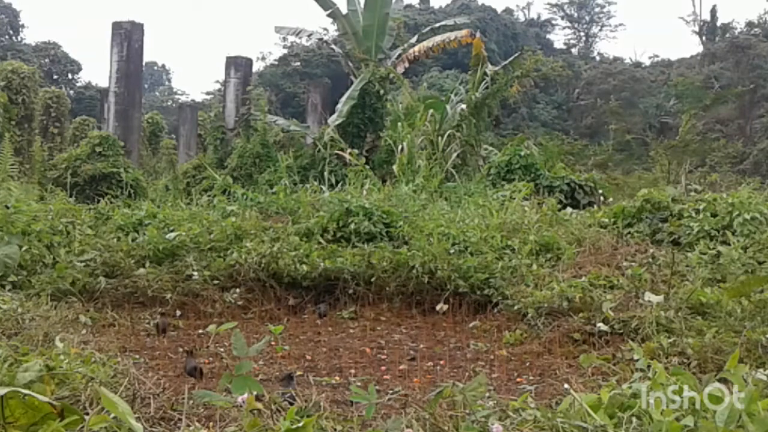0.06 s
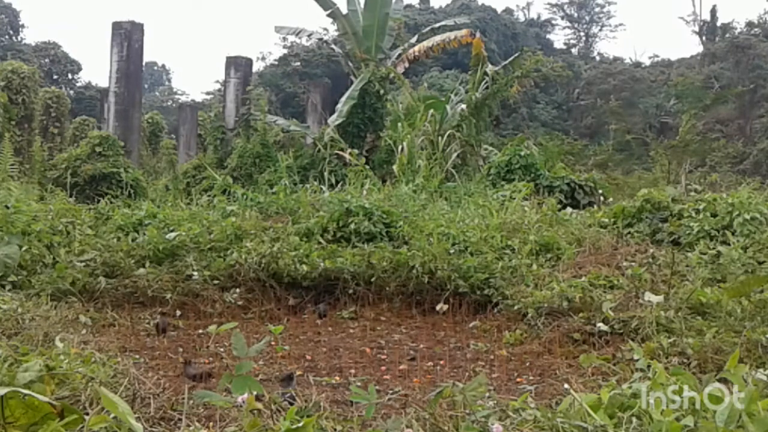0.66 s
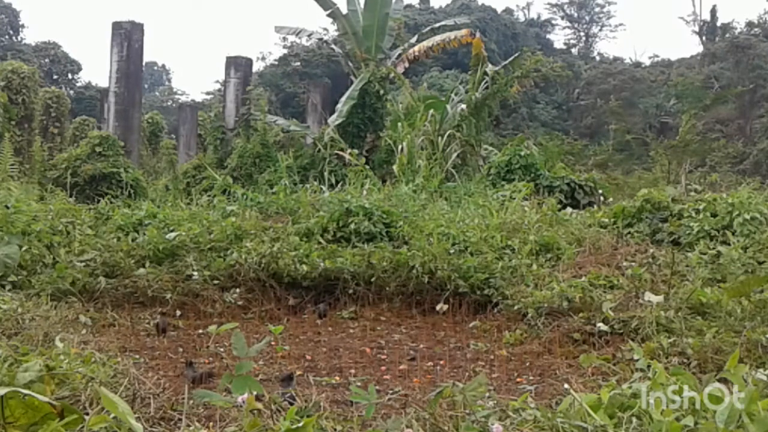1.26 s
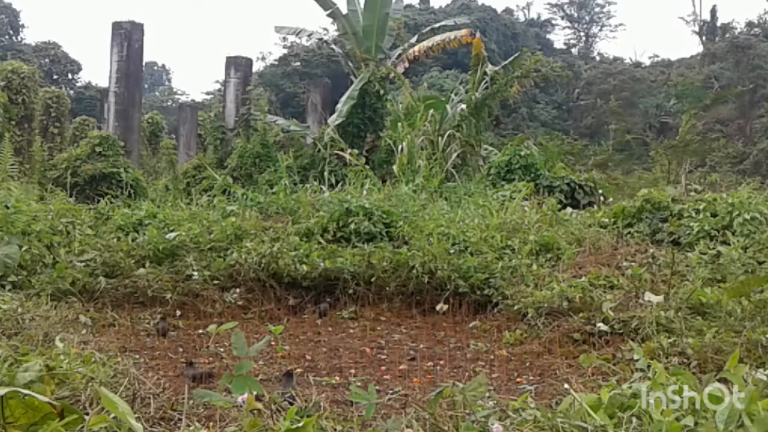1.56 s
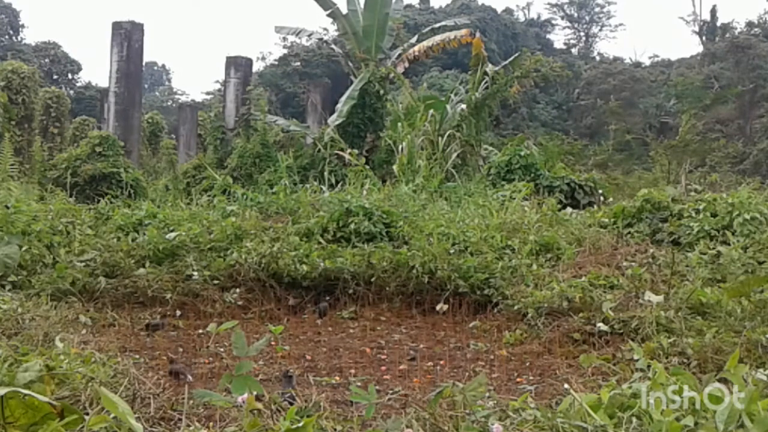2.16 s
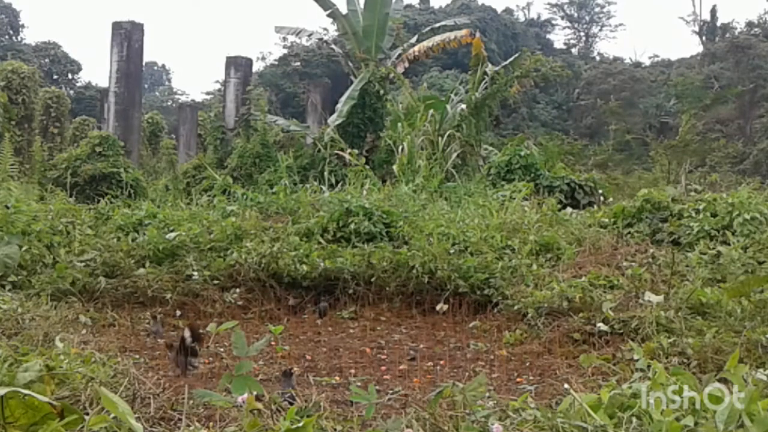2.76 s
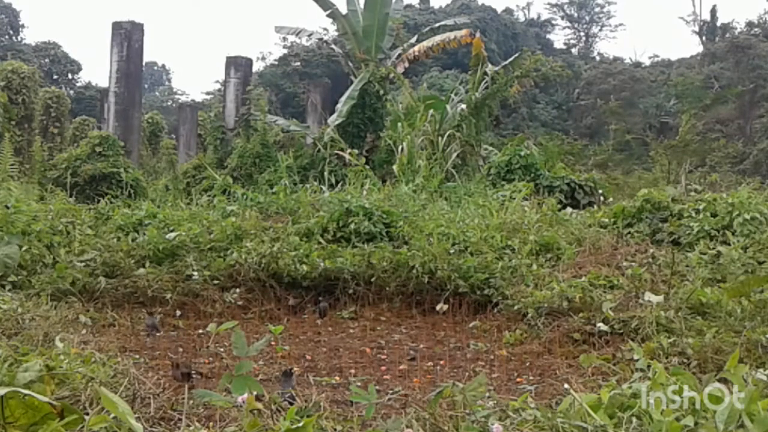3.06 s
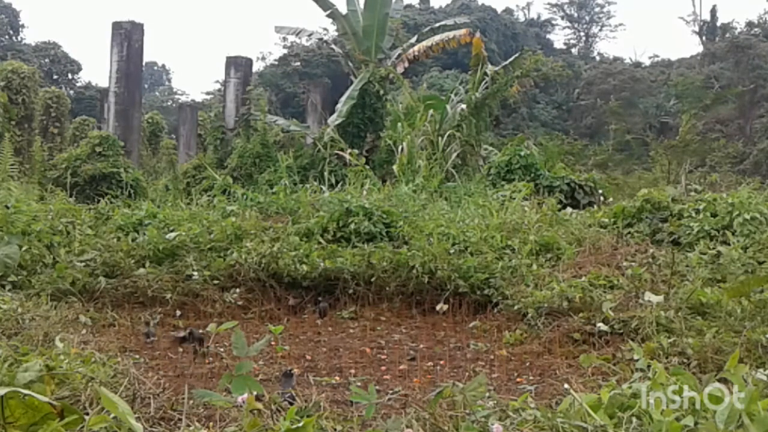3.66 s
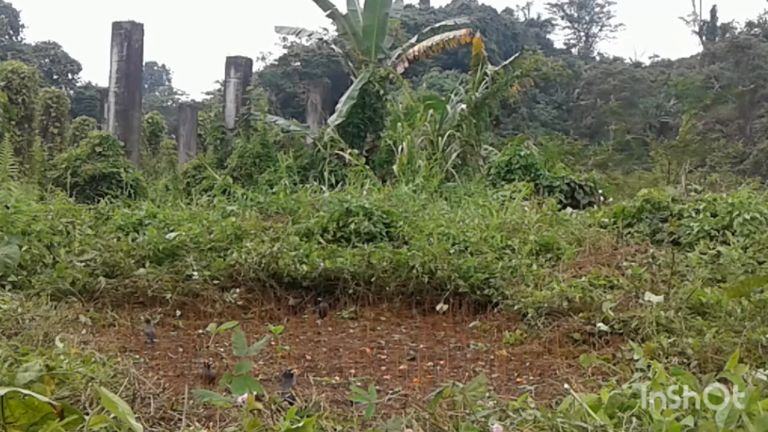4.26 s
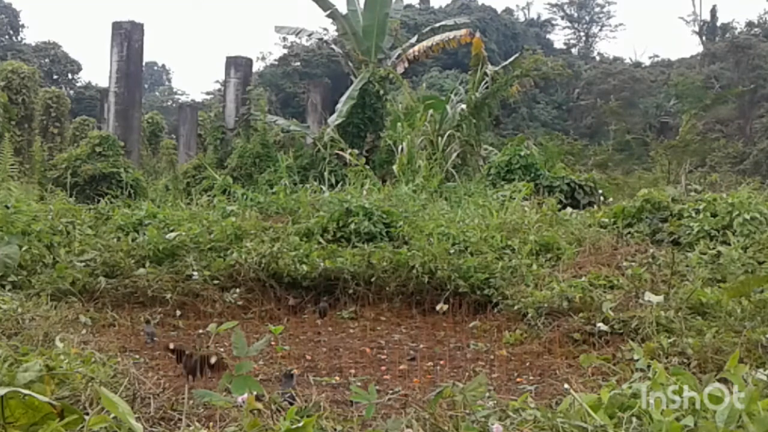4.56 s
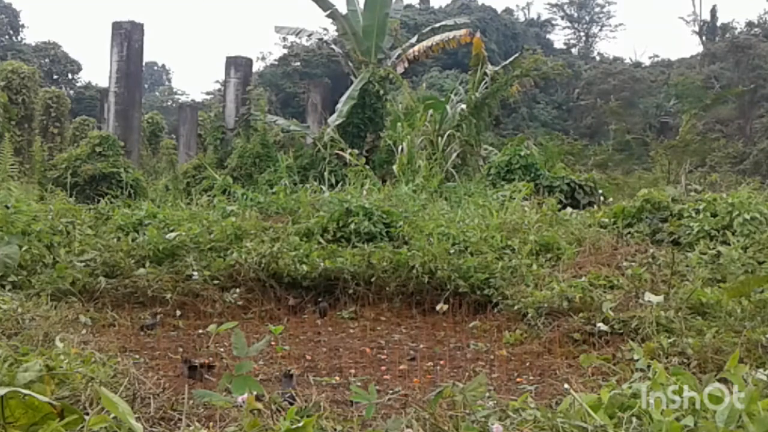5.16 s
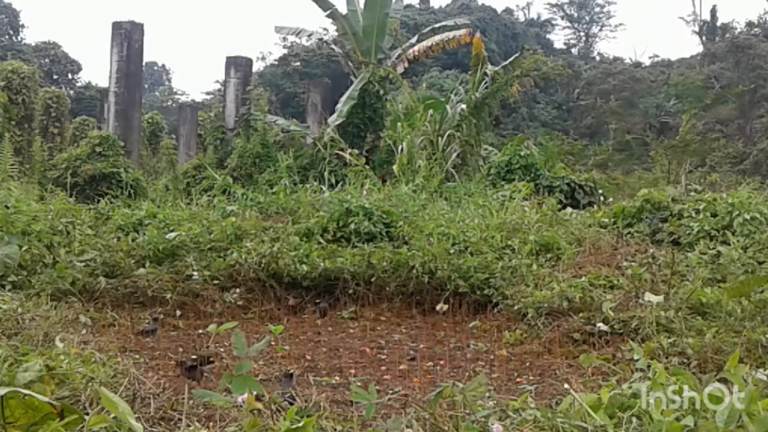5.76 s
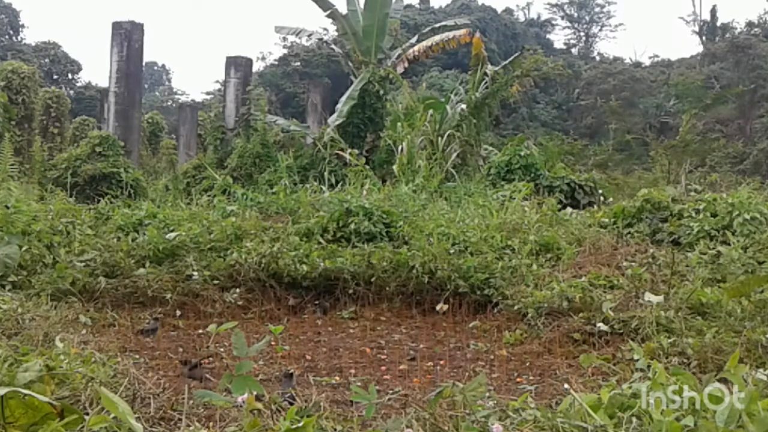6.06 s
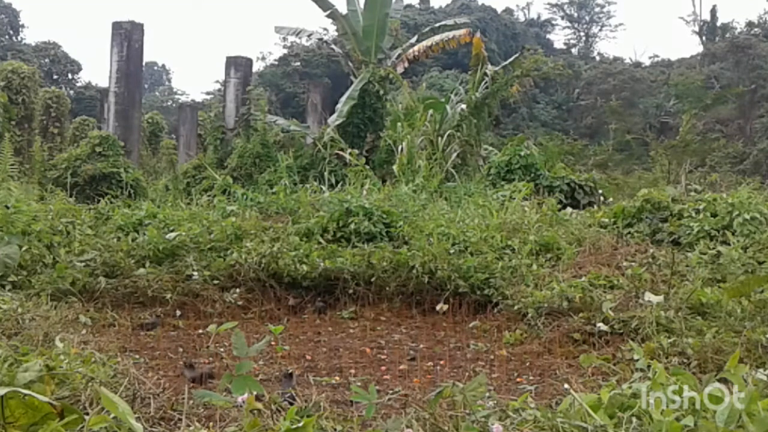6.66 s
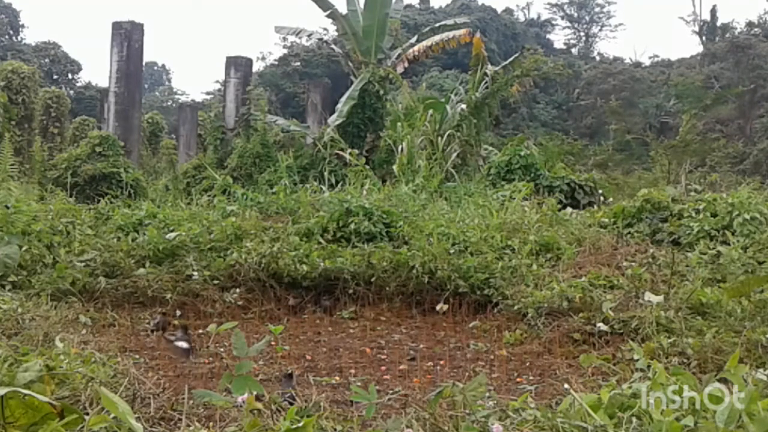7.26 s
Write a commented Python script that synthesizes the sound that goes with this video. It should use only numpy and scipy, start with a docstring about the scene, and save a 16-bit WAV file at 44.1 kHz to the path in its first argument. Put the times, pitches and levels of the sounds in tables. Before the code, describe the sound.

Outdoors among bushes, a steady high insect chorus and a fast-chirping cricket sit over the low rumble of a distant road. Starlings near the microphone break in with quick clusters of warbles, then sharp upward squeals, each with a slight short echo. Between calls there are a few faint ticks of dry litter and soft wing flutters, thin far whistles and barely audible horn toots.

```python
"""Starlings squabble on bare ground in open scrub, with warbled calls and sharp rising squeals.
Each call is a gliding whistle with overtones (fainter, higher copies), scattered back by the bushes.
Dry litter ticks and wings flutter. A cricket scrapes its wings over a chorus of insects,
small birds answer from afar, and engines hum and a horn toots faintly on a distant road."""
import sys
import numpy as np
from scipy import signal
from scipy.fft import rfft, irfft, next_fast_len
from scipy.io import wavfile
from scipy.ndimage import uniform_filter1d

SR = 44100
rng = np.random.default_rng(int(sys.argv[2]) if len(sys.argv) > 2 else 0)


def waveform_to_disk(signal):
    """Save audio, clipped to [-1, 1], as 16-bit WAV at the path in sys.argv[1]."""
    frames = np.transpose(np.atleast_2d(signal))
    scaled = np.clip(frames, -1, 1) * 32767
    samples = np.round(scaled).astype(np.int16)
    wavfile.write(sys.argv[1], SR, samples)


N = 331191
TIME = np.arange(N) / SR

# Warbles, with levels before the throat colours them; farness runs from 0 (near) to 1 (far):
# first_crest_s, spacing_s, hold_s, first_crest_hz, last_crest_hz, trough_hz, held_hz,
# first_db, held_db, overtones_db_per_octave, farness
WARBLE_CALLS = [(0.564, .025, 0.05, 3240, 4090, 2510, 3185, -33.5, -21, -21.5, 0.2),
                (0.684, 0.027, 0.037, 3600, 4280, 2800, 3470, -25, -19.5, -17.5, 0.1),
                (1.1, 0.024, 0.051, 4050, 4490, 3360, 3695, -60, -49, -30, 1),
                (1.851, 0.029, 0.045, 2875, 4010, 2410, 3087, -26, -15.5, -23, 0.24),
                (1.961, 0.028, 0.039, 3960, 4260, 2876, 3496, -14, -16.5, -22, 0.01),
                (2.209, .0295, 0.055, 3825, 4440, 2940, 3450, -19, -12, -12.5, 0.03),
                (3.773, 0.027, 0.044, 2930, 3880, 2240, 3090, -27, -19.5, -18, 0),
                (3.889, .025, 0.0408, 3590, 4330, 2818, 3360, -24, -20.5, -11.5, 0.12),
                (4.639, 0.028, 0.055, 4200, 4450, 2850, 3473, -30, -17, -23, 0.16),
                (6.758, 0.026, 0.05, 4200, 4440, 2765, 3455, -27.5, -17, -22.5, 0.06)]
# Squeals: leap_s, after_leap_s, start_hz, top_hz, held_hz, quaver_delay_s, quaver_length_s,
# quaver_depth_hz, sweep_db, top_db, held_db, overtones_db_per_octave, farness
SQUEAL_CALLS = [(4.097, 0.067, 2000, 5370, 3660, 0.024, 0.021, 300, -52, -48, -53, -26, 0.84),
                (4.681, 0.089, 1300, 6045, 3958, .027, 0.016, 500, -33, -17.5, -10.5, -17.5, 0.08),
                (4.846, 0.11, 1550, 5960, 4117, 0.0303, 0.0232, 600, -6.5, -9.5, -11.5, -11.5, 0.05),
                (6.54, 0.13, 2910, 5480, 3908, .018, .043, 905, -39, -31.5, -16.5, -17, 0.06)]
# Creaks, buzzes and hoarse run-ups to a call:
# start_s, length_s, start_hz, end_hz, start_db, end_db, overtones_db_per_octave, roughness
SLIDE_CALLS = [(1.835, 0.12, 2120, 2700, -47.5, -34.5, -8.5, 0.2),
               (1.947, 0.09, 3080, 3950, -27.5, -27, -18, .05),
               (2.18, 0.022, 1440, 2745, -34.5, -24, -14.5, 0.87),
               (4.648, .033, 1057, 2583, -35, -31, -2, 0.2), (4.805, .02, 1110, 1750, -32, -15, -4, .3),
               (6.525, .02, 1020, 1080, -47.5, -40, 5, .1)]
# Scoops between warbles: start_s, length_s, lowest_hz, level_db, overtones_db_per_octave
SCOOP_CALLS = [(.655, 0.027, 2530, -36, -3.5), (1.941, 0.021, 2312, -22, -5.5),
               (3.859, 0.027, 2214, -31, 1.5)]
# How throat and beak strengthen or weaken each pitch: pitch_hz, gain_db
THROAT_COLOUR = [(1000, -19.5), (1500, -19), (2300, -9), (2800, -6), (3300, -2.5), (3700, -5), (4200, -7.5),
                 (4900, -6), (5600, -7.5), (6200, -4.5), (7000, -3.5), (8000, 5), (8700, -3), (9400, -4.5),
                 (10300, -1.5), (12200, 2.5), (14000, -2), (16000, -5)]
# Ticks in the dry litter: start_s, level_db, decay_s
LITTER_TICKS = [(2.881, -52.5, 0.01), (2.925, -61, 0.0053), (3.698, -48, .004), (3.725, -49.5, 0.0054),
                (4.422, -37.5, 0.0026), (4.458, -56, .004), (7.235, -49, .005)]
# Wing flutters: middle_s, level_db, half_length_s
WING_PUFFS = [(2.885, -47, 0.018), (3.726, -47, .02)]
# The near cricket's tone: time_s, pitch_hz, level_db, overtone_db
CRICKET_TONE = [(0, 6313, -54, -84), (3.4, 6390, -53, -71.5), (3.8, 6380, -53.5, -66),
                (4.3, 6470, -51, -65.5), (5.8, 6480, -52, -67), (7.5, 6430, -52, -65)]
# The cricket's pace: time_s, chirps_per_s
CRICKET_PACE = [(0, 16.22), (5, 16.12), (7.5, 15.78)]
# Wing strokes in one chirp: offset_from_middle_s, strength
CRICKET_STROKES = [(-.02, .55), (-.007, .9), (.007, 1)]
# Thin whistles from the far trees: start_s, length_s, start_hz, end_hz, level_db
TREE_WHISTLES = [(1.417, 0.2, 3110, 2990, -66.5), (2.751, 0.38, 3415, 3370, -73),
                 (5.275, .07, 3100, 3020, -62.5), (5.399, 0.066, 3040, 2960, -64.5),
                 (7.095, 0.38, 3420, 3360, -67.5)]
# Noise colours of the insect chorus and a faint hiss: pitch_hz, relative_db
CHORUS_COLOUR = [(5400, -29.5), (5850, -21.5), (6150, -3), (6400, -0.5), (6700, -1), (7000, -7),
                 (7400, -2.5), (7650, -9), (7950, -20), (8500, -37.5)]
HISS_COLOUR = [(1500, 15), (2800, 7.5), (3450, 7), (4100, 2), (5300, -4.5), (8300, -6.5), (9000, -4),
               (10000, -8.5), (11800, -5), (12700, 6), (13300, 1.5), (14200, 0), (16000, 0.5)]
# An engine gathering speed: time_s, firing_hz, first_harmonic_db, second_harmonic_db
RISING_ENGINE = [(0, 41, -62, -48), (1.5, 45.06, -57.5, -45), (2.6, 47.93, -48.5, -44),
                 (4, 53.33, -45.5, -43), (5.5, 55.95, -46, -53.5), (7.5, 60, -48.5, -85)]
# An engine running steadily: time_s, firing_hz, fifth_harmonic_db, sixth_harmonic_db
STEADY_ENGINE = [(0, 30.87, -40, -45), (1.5, 31.36, -44, -49.5), (3, 31.26, -38.5, -44.5),
                 (4, 31.55, -53.5, -49), (5.1, 30.94, -40.5, -52), (7.5, 32.2, -53, -50.5)]
# Noise colours of exhaust (rumble, roar), gears and tyres: pitch_hz, relative_db
RUMBLE_COLOUR = [(25, -35.5), (45, -10), (70, -2), (110, -0.5), (170, 2.5), (215, -3), (260, -15),
                 (400, -57.5)]
ROAR_COLOUR = [(150, -15.5), (255, 1.5), (330, -4.5), (400, -8), (520, -25)]
GEAR_COLOUR = [(330, -15.5), (420, -5), (490, 1.5), (580, -4), (700, -4), (950, -20.5)]
TYRE_COLOUR = [(400, -26), (600, -2), (750, 0.5), (1130, -0.5), (1500, -9.5), (2000, -16), (3000, -30),
               (5000, -34)]
# A far horn: middle_s, half_length_s, level_db
HORN_TOOTS = [(4.243, .17, -53), (4.75, .16, -51.5), (5.888, 0.042, -56)]


def starling(i, hz, db, overtones_db, rough, top_fall_db=5.0, lag_db_per_hz=0, lag_s=0.015):
    """A whistle with overtones at samples i; hoarseness shakes its pitch and strength and adds breath."""
    # the throat cannot follow a fast rise in pitch, which can weaken the lowest tone
    lag_hz = np.maximum(hz - uniform_filter1d(hz, int(lag_s * SR)), 0)
    hz = hz * (1 + .06 * rough * wander(2500, len(i)))
    phase = phase_of(hz)
    gains = []
    for k in range(1, 7):
        # each overtone flickers on its own, as when a call mixes with its reflection off the ground
        tilt_db = np.log2(k) * (overtones_db + 3.5 * wander(220, len(i)))
        throat_db = curves(THROAT_COLOUR, k * hz)[0]
        gains.append(gain(db + throat_db + tilt_db - top_fall_db * max(k - 2, 0)))
    gains[0] *= gain(-lag_db_per_hz * lag_hz)
    voice = 0
    for k, strength in enumerate(gains, 1):
        audible = np.clip((.42 * SR - k * hz) / 1000, 0, 1)  # drops overtones too high to hear
        voice += strength * np.sin(k * phase) * audible
    breath_band = signal.butter(2, [2200, 10500], "band", fs=SR, output="sos")
    breath = signal.sosfilt(breath_band, rng.standard_normal(len(i)))
    voice *= 1 + 0.41 * rough * wander(1400, len(i))
    voice += 0.24 * rough * breath * (gains[0] + gains[1])
    return place(i, np.sqrt(2) * voice)


def call(i, hz, db, overtones_db, attack_s=.008, release_s=.014, droop_hz=149.4, **throat):
    """One push of the voice: a hoarse start, a slightly unsteady middle and a drooping end."""
    since, left = (i - i[0]) / SR, (i[-1] - i) / SR
    attack = np.maximum(1 - since / attack_s, 0)
    release = np.maximum(1 - left / release_s, 0)
    hz = hz * (1 + 0.00875 * wander(200, len(i))) - droop_hz * release
    db = db - 18.5 * (attack + release) + wander(150, len(i))
    rough = 0.055 + .2 * np.exp(-since / 0.02)
    return starling(i, hz, db, overtones_db, rough, **throat)


def held_note(start, end, hz, sag_hz_per_s=3000):
    """The first and last (time, pitch) points of a note that sags as it is held."""
    sag = sag_hz_per_s * (end - start) / 2
    return [(start, hz + sag), (end, hz - sag)]


def warble(s, spacing, hold, first_hz, last_hz, trough_hz, held_hz, first_db, held_db, overtones_db):
    """The pitch flicks up three times, each higher than the last, then settles on a held note."""
    lead_s, rise_s, crest_s, fall_s = .011, .005, .005, .0145
    last = s + 2 * spacing
    turns = [(s - lead_s, 0.95 * trough_hz), (s - rise_s, trough_hz)]
    for step in (0, .5, 1):
        crest = s + step * (last - s)
        high = first_hz + (last_hz - first_hz) * step ** 0.62  # climbs fast, then levels off
        turns += [(crest - rise_s / 4, high), (crest + crest_s, .95 * high)]
        if step < 1:
            low = trough_hz + (held_hz - trough_hz) * step
            turns += [(crest + fall_s, low), (crest + spacing - rise_s, low)]
    turns += held_note(last + fall_s, last + hold, held_hz)
    i = span(s - lead_s, last + hold)
    db = glide([(s, first_db), (last + fall_s, held_db)], i)
    return call(i, glide(turns, i), db, overtones_db, top_fall_db=8.5, lag_db_per_hz=0.04)


def squeal(s, length, start_hz, top_hz, held_hz, delay, quaver_s, depth_hz,
           sweep_db, top_db, held_db, overtones_db):
    """A rising sweep leaps up about an octave, steps down, quavers and settles."""
    sweep_s, leap_s, top_s = .027, 0.0032, .018
    i = span(s - sweep_s, s + length)
    quaver_start, step_hz = s + delay, .78 * top_hz
    turns = [(s - sweep_s, start_hz), (s - .016, 2250), (s - leap_s / 2, 2890),
             (s + leap_s, 0.92 * top_hz), (s + top_s, top_hz),
             (s + top_s + leap_s, step_hz), (quaver_start + leap_s, step_hz)]
    turns += held_note(quaver_start + 2 * leap_s, s + length, held_hz)
    t = i / SR - quaver_start + .0008 * wander(70, len(i))
    quaver_hz = 86.1 * np.sqrt(580 / depth_hz)  # deeper swings take longer
    dips = (t > 0) * (t < quaver_s) * (np.sin(np.pi * quaver_hz * t) ** 4 - .2)
    levels = [(s, sweep_db), (s + leap_s, top_db), (s + top_s, top_db),
              (quaver_start + quaver_s, held_db)]
    return call(i, glide(turns, i) - depth_hz * dips, glide(levels, i), overtones_db, top_fall_db=3.5)


def slide(s, length, start_hz, end_hz, start_db, end_db, overtones_db, rough):
    """The voice makes a straight, reedy glide."""
    i = span(s, s + length)
    hz = np.linspace(start_hz, end_hz, len(i))
    db = np.linspace(start_db, end_db, len(i))
    return starling(i, hz, db, overtones_db, rough)


def scoop(s, length, low_hz, db, overtones_db, depth_hz=750):
    """The pitch drops from one warble, bottoms out and lifts into the next."""
    i = span(s, s + length)
    hz = low_hz + depth_hz * np.linspace(-1, 1, len(i)) ** 4
    return starling(i, hz, db, overtones_db, rough=0.074, top_fall_db=17)


def flock(voice, table):
    """Shares each call between the bare ground nearby and the far bushes."""
    near, far = np.zeros((2, N))
    for *row, farness in table:
        sound = voice(*row)
        near += sound * (1 - farness)
        far += sound * farness
    return near, far


def litter_ticks():
    """Dry litter cracks as the birds peck and hop."""
    loudness = sum(gain(db) * (TIME >= s) * np.exp(-np.abs(TIME - s) / decay)
                   for s, db, decay in LITTER_TICKS)
    return loudness * noise([(900, -2.5), (2000, 4.5), (5500, -6.5), (8000, -16.5), (15000, -30)])


def wing_flutters():
    """Beating wings push soft puffs of air as a bird hops up."""
    loudness = sum(gain(db) * np.exp(-((TIME - s) / half) ** 2) for s, db, half in WING_PUFFS)
    return loudness * noise([(180, -14), (280, -6), (370, 1), (460, -19), (900, -27)])


def cricket(stroke_s=0.0031):
    """Three strokes a chirp make the wing ring with a wavering pitch."""
    hz, db, overtone_db = curves(CRICKET_TONE)
    pace, = curves(CRICKET_PACE)
    chirp_count = np.cumsum(pace) / SR
    offset_s = ((chirp_count + .5) % 1 - .5) / pace  # time from the nearest chirp's middle
    strokes = sum(size * np.exp(-((offset_s - s) / stroke_s) ** 2) for s, size in CRICKET_STROKES)
    phase = phase_of(hz * (1 + 0.0062 * wander(700)))
    ring = gain(db) * np.sin(phase) + gain(overtone_db) * np.sin(2 * phase)
    return np.sqrt(2) * ring * strokes * gain(2.2 * wander(29))


def insects():
    """Countless far insects merge into a high drone over a faint hiss."""
    chorus = noise(CHORUS_COLOUR) * gain(-59 + .5 * wander(25))
    hiss = noise(HISS_COLOUR) * gain(-64 + 0.37 * wander(1.4))
    return chorus + hiss


def far_bird(s, length, start_hz, end_hz, db):
    """Distance leaves only a whistle's lowest tone, wavering and broken."""
    i = span(s, s + length)
    hz = np.linspace(start_hz, end_hz, len(i)) * (1 + 0.0284 * wander(120, len(i)))
    return place(i, gain(db + 2.5 * wander(84, len(i))) * np.sin(phase_of(hz)))


def far_chatter(hz=3340, voices=3):
    """Calls from the far trees blur into a faint, wandering shimmer."""
    return sum(gain(-70.5 + 3.5 * wander(7.6)) * np.sin(phase_of(hz * (1 + 0.062 * wander(60))))
               for _ in range(voices)) / voices


def engine(table, harmonics, waver):
    """Two harmonics (multiples of the firing rate) carry this far; the air makes them swell and fade."""
    hz, *levels = curves(table)
    phase = phase_of(hz * (1 + waver * wander(6)))
    tones = (gain(db + 0.5 * wander(7)) * np.sin(k * phase) for k, db in zip(harmonics, levels))
    return np.sqrt(2) * sum(tones)


def vehicle(colour, db, nearest_s, reach_s):
    """Vehicle noise, loudest at nearest_s and 3 dB weaker reach_s before or after."""
    return noise(colour) * gain(db) / np.hypot(1, (TIME - nearest_s) / reach_s)


def road():
    """Distant traffic: engines, gears, and exhaust and tyre noise that slowly draw nearer."""
    rumble = vehicle(RUMBLE_COLOUR, db=-38, nearest_s=8.7, reach_s=6.1)
    roar = vehicle(ROAR_COLOUR, db=-46.5, nearest_s=8.0, reach_s=2.26)
    gears = vehicle(GEAR_COLOUR, db=-53.5, nearest_s=2.1, reach_s=2.0)
    tyres = vehicle(TYRE_COLOUR, db=-48.5, nearest_s=6.9, reach_s=2.8)
    engines = engine(RISING_ENGINE, (1, 2), waver=.008) + engine(STEADY_ENGINE, (5, 6), waver=.018)
    return rumble + roar + gears + tyres + engines


def far_horn(hz=668):
    """A faint horn toots on the road, blurred by distance."""
    toots = sum(gain(db) * np.exp(-((TIME - s) / half) ** 4) for s, half, db in HORN_TOOTS)
    return toots * gain(4 * wander(27)) * np.sin(phase_of(hz * (1 + 0.01393 * wander(50))))


def bushes(sound, near_db, far_db, near_fade_s=0.073, far_fade_s=0.39, dull_hz=6500):
    """Leaves close by scatter the sound at once; the thicket behind returns a longer, duller echo."""
    t = TIME[:SR]
    near, far = rng.standard_normal((2, SR))
    leaves = signal.butter(1, dull_hz, fs=SR, output="sos")
    near = signal.sosfilt(leaves, near) * gain(-60 * t / near_fade_s) * (t > .002)
    far = signal.sosfilt(leaves, signal.sosfilt(leaves, far)) * gain(-60 * t / far_fade_s)
    far *= 1 - np.exp(-t / 0.014)  # the far echo builds up gradually
    echo = gain(near_db) * near / np.linalg.norm(near) + gain(far_db) * far / np.linalg.norm(far)
    return sound + signal.fftconvolve(sound, echo)[:N]


def gain(db):
    """Turns decibels into a multiplier."""
    return 10 ** (np.asarray(db) / 20)


def phase_of(hz):
    """The running angle of a wave whose pitch changes."""
    return 2 * np.pi * np.cumsum(hz) / SR


def curves(table, at=TIME):
    """Joins a table's rows with straight lines, looked up by its first column."""
    first, *columns = np.transpose(table)
    return [np.interp(at, np.maximum.accumulate(first), column) for column in columns]


def glide(turns, i):
    """A path through (time, value) points with rounded corners."""
    return uniform_filter1d(curves(turns, i / SR)[0], size=131)


def wander(rate, size=N):
    """A smooth random drift of roughly +-1 that changes about rate times a second."""
    width = max(int(SR / rate), 2)
    steps = np.repeat(rng.standard_normal(size // width + 2), width)
    return 1.3 * uniform_filter1d(uniform_filter1d(steps, width), width)[:size]


def noise(colour):
    """Noise of strength 1, shaped by (pitch_hz, relative_db) points."""
    hz, db = np.transpose(colour)
    size = next_fast_len(N)
    pitches = np.maximum(np.fft.rfftfreq(size, 1 / SR), 1)
    shape = gain(np.interp(np.log(pitches), np.log(hz), db, left=-120, right=-120))
    sound = irfft(rfft(rng.standard_normal(size)) * shape, size)[:N]
    return sound / sound.std()


def span(start, end):
    """The sample numbers between two times."""
    return np.arange(int(start * SR), min(int(end * SR), N))


def place(i, sound):
    """Puts a sound into silence at samples i, with soft edges so it does not click."""
    track = np.zeros(N)
    track[i] = sound * signal.windows.tukey(len(i), min(.006 * SR / len(i), 1))
    return track


def scene():
    """Near and far birds and the cricket among the bushes, over the insects and the road."""
    warbles, far_warbles = flock(warble, WARBLE_CALLS)
    squeals, far_squeals = flock(squeal, SQUEAL_CALLS)
    slides = sum(slide(*row) for row in SLIDE_CALLS)
    scoops = sum(scoop(*row) for row in SCOOP_CALLS)
    ground = gain(-0.8) * warbles + slides + scoops + litter_ticks()
    near = bushes(ground, near_db=-15, far_db=-26, far_fade_s=0.46, dull_hz=5850)
    # the squeals come from closer by, so their echo is shorter
    near += bushes(gain(-2.56) * squeals, near_db=-15.5, far_db=-26, far_fade_s=0.38, dull_hz=6180)
    whistles = sum(far_bird(*row) for row in TREE_WHISTLES)
    far = bushes(far_warbles + far_squeals + whistles + far_chatter(), near_db=-6, far_db=-8.5)
    chirps = bushes(cricket(), near_db=-12, far_db=-16)
    return (near + far + chirps + insects() + road() + wing_flutters() + far_horn())[None]


def record(dry, top_hz=15680):
    """A steep filter cuts off the highest treble."""
    return signal.sosfiltfilt(signal.ellip(10, .05, 60, top_hz, fs=SR, output="sos"), dry)


dry = scene()
out = record(dry)
waveform_to_disk(out)
```